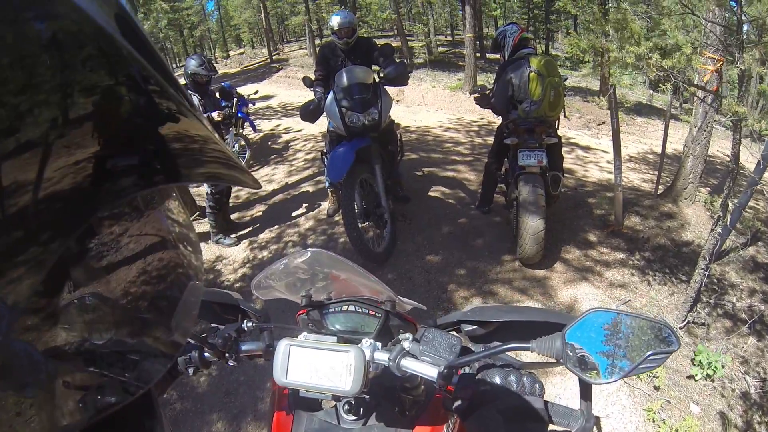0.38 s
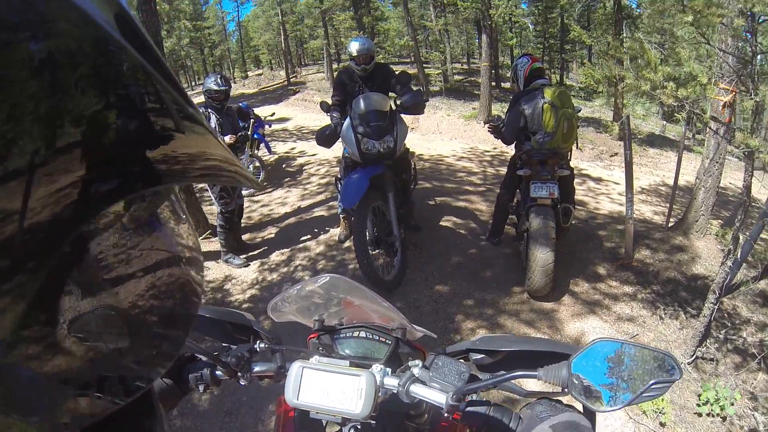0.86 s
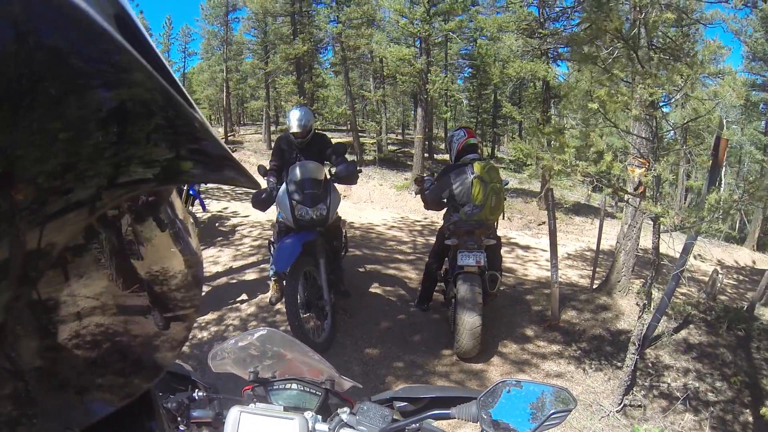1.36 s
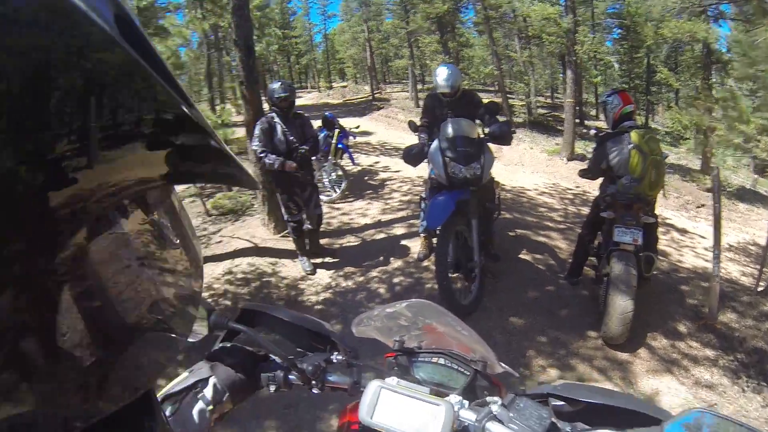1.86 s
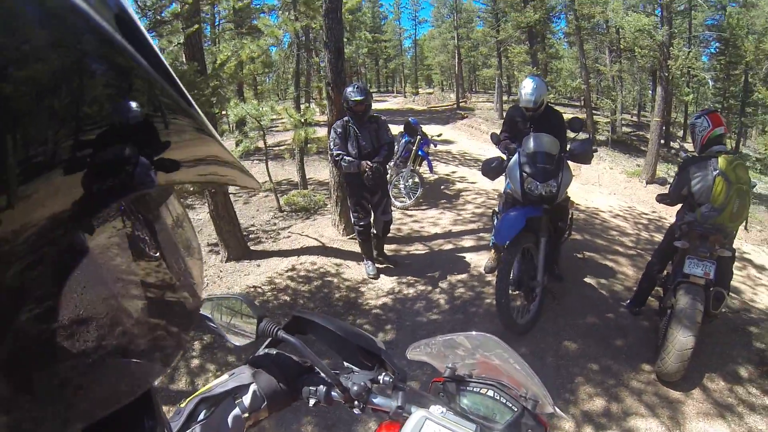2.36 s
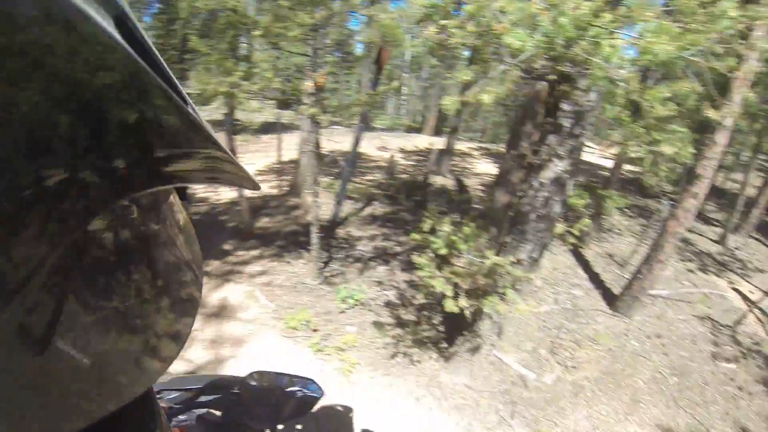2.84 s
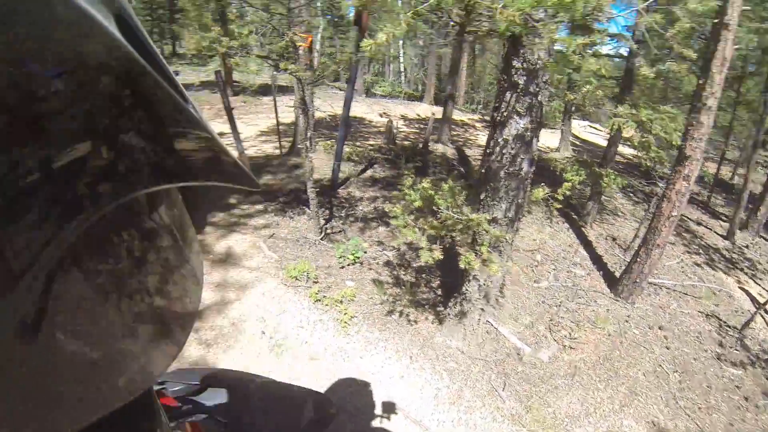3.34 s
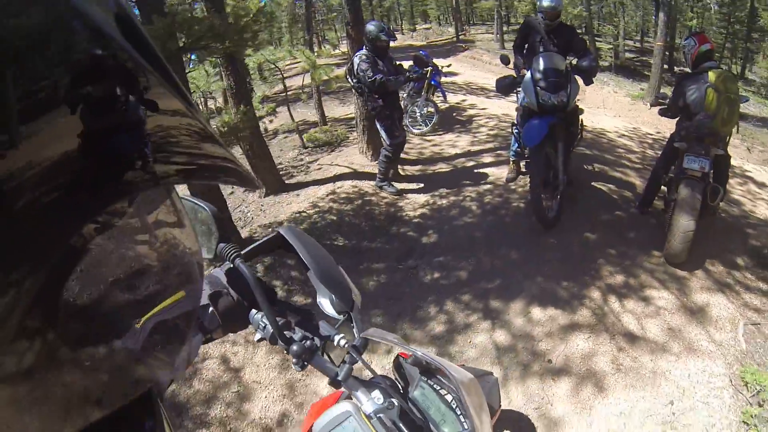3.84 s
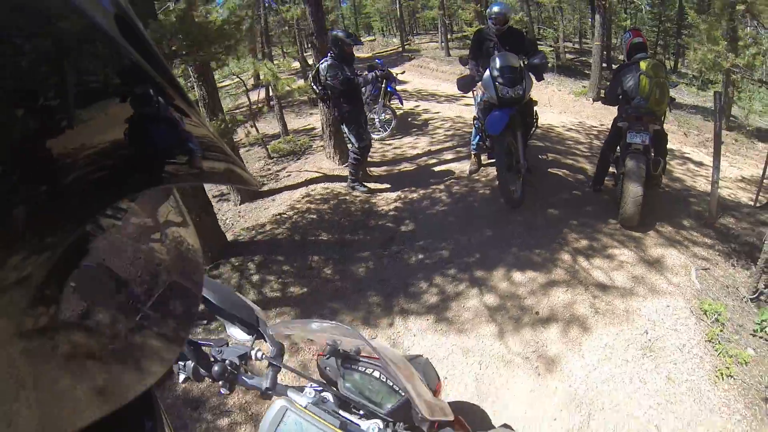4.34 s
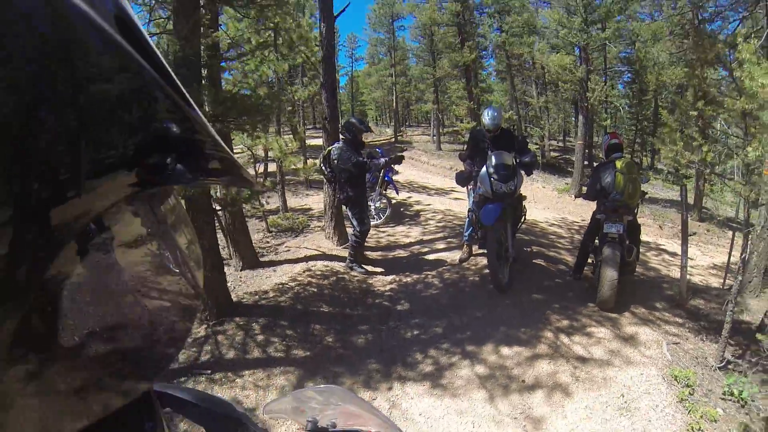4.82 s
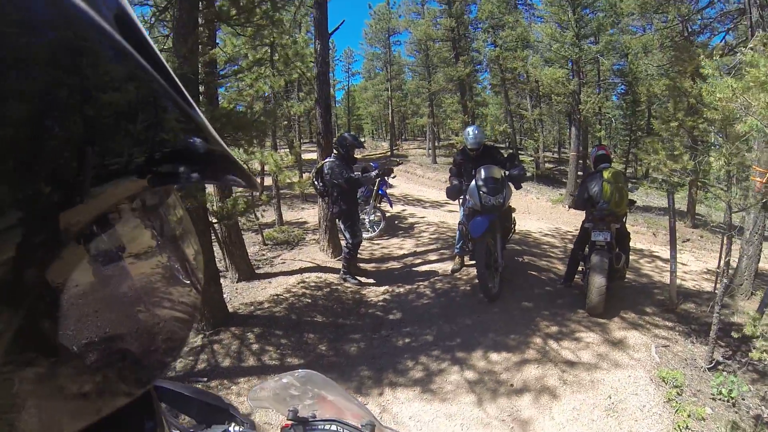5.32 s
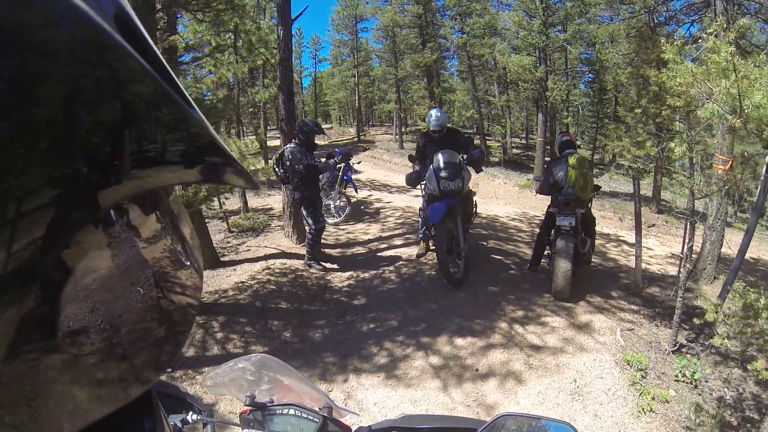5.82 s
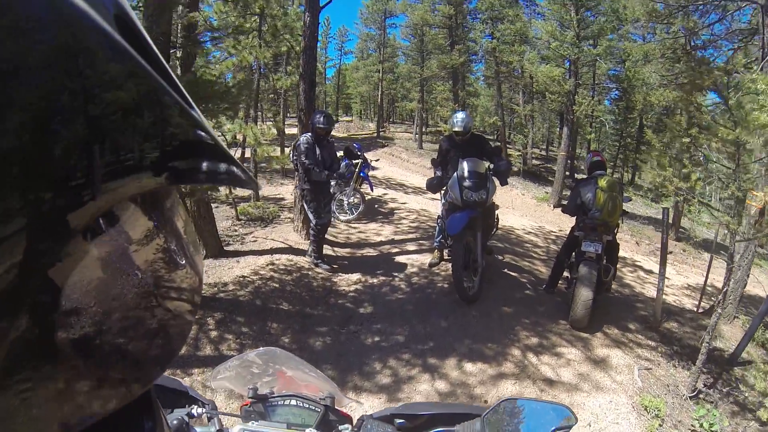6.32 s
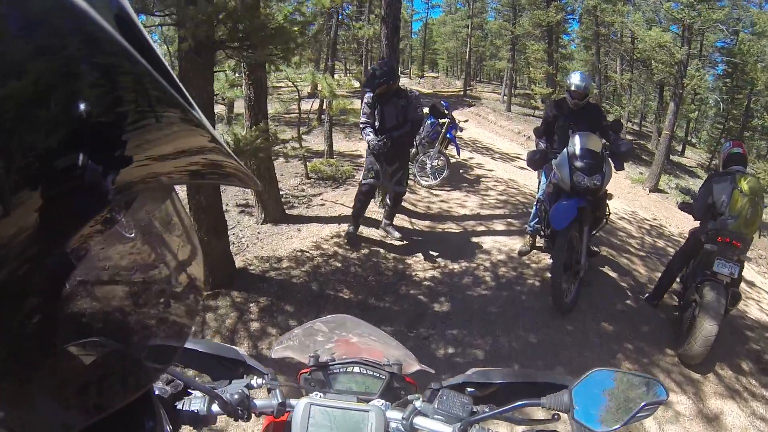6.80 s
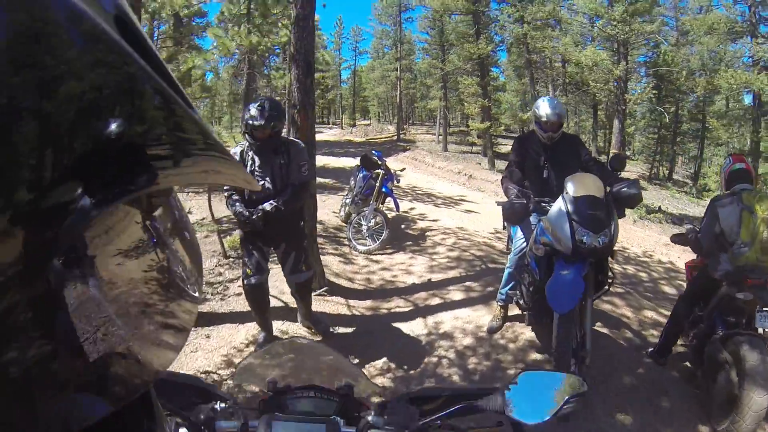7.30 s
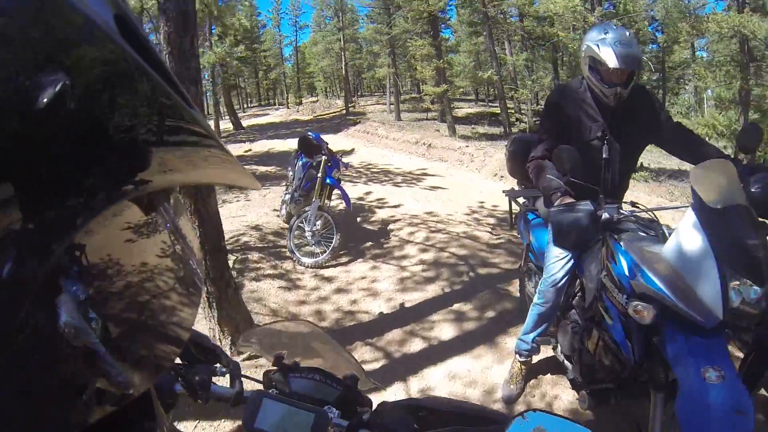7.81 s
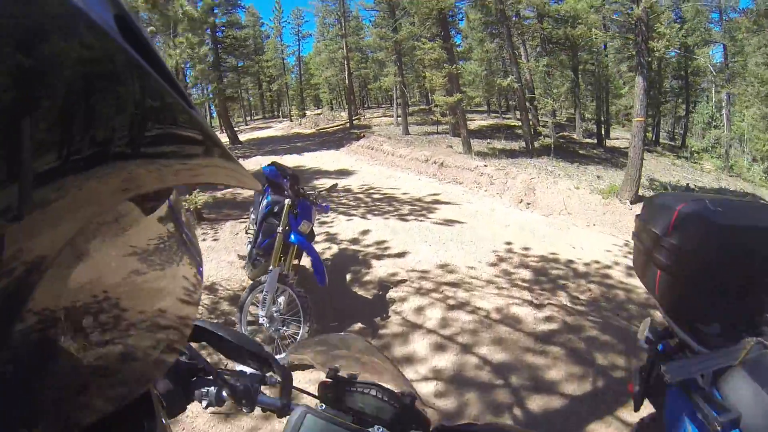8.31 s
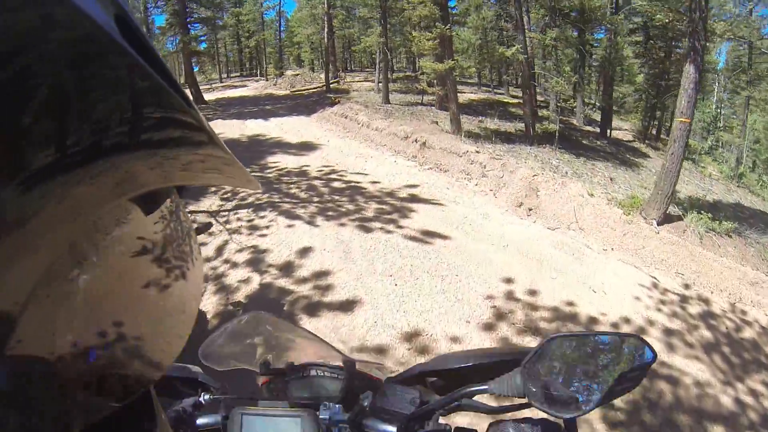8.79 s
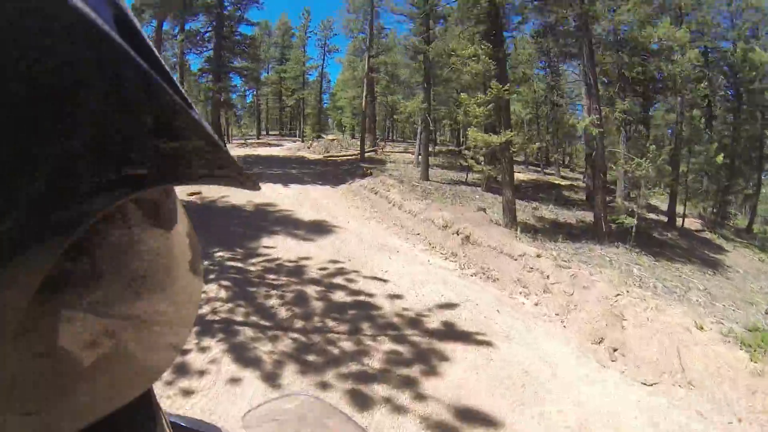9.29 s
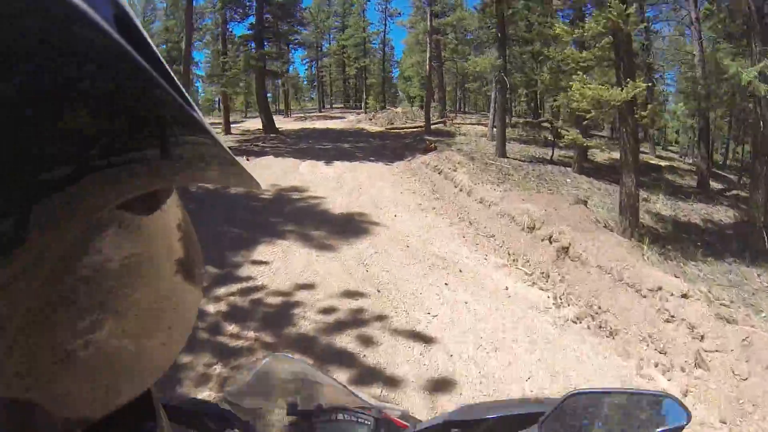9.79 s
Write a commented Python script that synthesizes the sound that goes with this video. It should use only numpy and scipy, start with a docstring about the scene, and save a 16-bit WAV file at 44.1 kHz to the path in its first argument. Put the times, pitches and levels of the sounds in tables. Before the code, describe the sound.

Close, mono, slightly muffled capture of a motorcycle starting on a dirt trail: brief cranking, a rising flare, then uneven idle with dry valve ticking. A cluster of gear knocks lands near three seconds. Soft throttle blips follow, a slow low idle, then the bike moves off and revs harder at the end. Deep mount thuds and shudders accompany it, over thin electronic whine and hiss, with rare high bird chips.

```python
"""A two-cylinder motorcycle is cranked, catches, idles, clunks into gear and revs to pull away on a trail.
Its engine is uneven pairs of pulses ringing pipes and silencer, with bursts of noise as valve clatter.
Decaying modes make the knocks; a wandering low tone and low noise make the shudder of the helmet camera's mount.
Falling sine chips are a few small birds; a thin whine and hiss come from the electronics."""
import sys
import numpy as np
from scipy import signal
from scipy.fft import rfft, irfft, next_fast_len
from scipy.io import wavfile
from scipy.ndimage import uniform_filter1d, minimum_filter1d, map_coordinates

SR = 44100
rng = np.random.default_rng(int(sys.argv[2]) if len(sys.argv) > 2 else 0)


def convert_level_to_amplitude(level_db):
    """Map a level in decibels to its linear amplitude factor."""
    exponent = np.asarray(level_db, float) / 20
    return 10 ** exponent


def file_out(sig):
    """Save sig as 16-bit WAV at sys.argv[1]."""
    # one column per channel
    cols = np.atleast_2d(sig).T
    # limit, then scale
    lim = np.clip(cols, -1, 1)
    pcm = np.round(lim * 32767).astype(np.int16)
    wavfile.write(sys.argv[1], SR, pcm)


N = 437031
T = np.arange(N) / SR

# Bird chips. Each row: start in seconds, start pitch in Hz, end pitch in Hz, length in seconds, level in dB.
BIRD_CHIPS = [(2.32, 10650, 9700, 0.047, -62.5), (5.343, 10930, 9700, 0.035, -59.5),
              (6.301, 8140, 7000, .04, -65.5), (9.12, 10650, 9700, 0.046, -59)]
# Electronic whine. Each row: pitch in Hz, rms level in dB.
WHINE_TONES = [(10643, -73), (10691, -80), (10741, -91), (10837, -93), (13187, -92)]
# Colour of the electronic hiss. Each row: frequency in Hz, relative density in dB per Hz.
HISS_COLOUR = [(2940, -46), (5000, -13), (6800, -22), (10200, -14), (10300, -15), (11000, -14.5),
               (11300, -18), (12600, -25.5), (13200, -18), (13600, -23), (15500, -47), (16500, -120)]

# Shudder of the camera mount. Each row: time in seconds, level in dB, central pitch in Hz.
MOUNT_SHUDDER = [(0.0, -39, 26.9), (0.22, -38, 33.3), (0.52, -21, 31.7), (0.63, -33, 34.2),
                 (0.75, -24, 30.1), (1.07, -32, 30.3), (1.19, -39, 34.2), (1.35, -29, 34.5),
                 (1.63, -36, 31.1), (1.76, -35, 36.9), (1.87, -30, 34.6), (1.99, -24, 28.3),
                 (2.07, -16, 27.6), (2.21, -28, 27.6), (2.45, -20, 27.5), (2.56, -22, 28.8),
                 (2.76, -29, 27.3), (2.87, -16, 27.6), (3.25, -23, 27.7), (3.42, -15, 26.2),
                 (3.5, -23, 26.2), (3.81, -26, 27.7), (4.06, -24, 27.5), (4.11, -14, 26.5),
                 (4.3, -21, 26.2), (4.36, -9, 27.2), (4.47, -28, 28.8), (4.53, -17, 28.9), (5.6, -29, 29.0),
                 (5.71, -29, 30.6), (6.07, -24, 28.5), (6.29, -27, 32.1), (6.65, -16, 30.1),
                 (6.85, -18, 30.4), (6.93, -13, 32.9), (7.06, -13, 33.0), (7.17, -17, 30.3),
                 (7.31, -22, 30.1), (7.48, -23, 31.8), (7.73, -12, 30.0), (7.84, -24, 27.0),
                 (7.92, -11, 26.2), (8.09, -24, 27.6), (8.17, -9, 27.6), (8.28, -16, 27.5),
                 (8.34, -30, 28.4), (8.42, -20, 32.0), (8.58, -14, 28.9), (8.83, -10, 28.9),
                 (8.94, -9, 30.2), (9.05, -27, 30.3), (9.14, -20, 30.2), (9.24, -18, 26.2),
                 (9.36, -26, 27.4), (9.44, -11, 27.6), (9.58, -22, 27.5), (9.69, -10, 27.8),
                 (9.8, -23, 31.9), (9.85, -11, 33.1), (9.91, -16, 32.9)]
# Sudden head movements. Each row: middle in seconds, level in dB, length in seconds.
HEAD_NODS = [(2.632, -18.5, 0.17), (4.102, -19, 0.17), (5.4, -37.5, .2), (8.506, -17, .3), (9.3, -13, .15)]
# Jolts that set the bracket humming. Each row: start in seconds, level in dB, seconds to fade 20 dB.
BRACKET_JOLTS = [(.42, -33, 1), (1.45, -35, 2), (2.9, -33.5, 2.2), (3.421, -21.5, 0.7), (3.6, -48, 0.5),
                 (8.6, -25, 1), (8.78, -22.5, 0.13), (8.901, -23, 0.4)]

# Small parts that ping once. Each row: start in seconds, pitch in Hz, level in dB.
PART_PINGS = [(1.755, 5050, -52), (1.762, 4550, -52), (1.79, 4400, -52), (2.245, 3650, -50),
              (2.25, 4600, -54), (2.35, 5050, -54), (7.85, 3100, -46), (7.88, 3300, -49), (7.93, 3050, -42),
              (8.02, 3150, -46), (8.47, 4000, -46)]
# Gear clunks and case taps. Each row: start in seconds, overall level in dB, then thud, hollow, ping
# and click in dB relative to that level.
KNOCK_EVENTS = [(2.737, -31.5, 8, 1, -25, -10), (2.7445, -31.5, 8, 4, -25, -16),
                (2.7546, -19.5, -8, -27, -30, -37), (2.79, -24, -8, -20, -28, -45),
                (2.818, -21, -8, -20, -26, -40), (2.862, -21, -10, -12, -30, -50),
                (2.8707, -10, -4.5, -9, -32, -55), (2.8764, -5, 16, -8, -34, -42),
                (2.908, -15, 10, -4, -26, -41), (2.921, -24, -8, -6, -22, -42),
                (2.934, -27, -8, -10, -22, -50), (3.8113, -19, -7, -32, -32, -42),
                (6.32, -20, 2, -36.5, -32, -36), (8.8725, -18, -2, -24.5, -9, -26),
                (8.8893, -10, 4, -8.5, -27, -48)]
# Mode groups a knock can ring, from deep to thin. Each row: pitch in Hz, relative level in dB,
# time to fall 60 dB in seconds.
THUD_MODES = [(70, -8, 0.13), (91, -12, 0.27)]
HOLLOW_MODES = [(495, 5, 0.052), (561, 1, 0.038), (655, -6, 0.025)]
SHELL_MODES = [(787, -21.5, 0.079), (1165, -0.5, 0.019), (1510, 4, 0.024), (1714, -3, 0.031)]
PING_MODES = [(3270, 0.5, 0.018), (2400, -5, 0.025)]
TICK_MODES = [(4970, 3, 0.013)]

# Starter strokes before the engine catches. Each row: start in seconds, length in seconds, level in dB.
STARTER_STROKES = [(0.093, 0.059, -38), (0.303, 0.049, -41.5)]
# Starter gear whine. Each row: time in seconds, level in dB.
GEAR_WHIRR = [(0, -64), (.12, -57), (.25, -66), (.46, -55), (.56, -56), (.7, -66)]

# Crankshaft speed. Each row: time in seconds, speed in rpm.
CRANK_RPM = [(0.38, 1001.5), (0.5, 1326.1), (0.72, 1759.9), (1.0, 2031.0), (1.23, 2202.0), (1.38, 2000.3),
             (1.6, 1763.8), (1.8, 1282.8), (2.0, 1175.3), (2.15, 1189.8), (2.25, 1366.4), (2.59, 1309.6),
             (2.93, 1357.5), (3.44, 1241.6), (3.61, 1387.5), (4.3, 1373.0), (4.97, 1360.6), (5.14, 1795.6),
             (5.4, 1586.3), (5.65, 1464.5), (5.82, 1787.9), (5.99, 1479.2), (6.3, 1337.1), (6.67, 1082.6),
             (7.01, 1064.1), (7.35, 1288.1), (7.69, 1279.7), (8.03, 1379.2), (8.37, 1764.7), (8.71, 1554.9),
             (8.95, 1550.9), (9.22, 1622.1), (9.39, 2056.0), (9.56, 1930.9), (9.7, 2162.3), (9.91, 2832.8)]
# Engine levels. Each row: time in seconds, exhaust bark in dB as the throttle opens and shuts, clatter in dB.
ENGINE_LEVELS = [(.38, -51.5, -44.5), (.47, -43, -40), (.75, -37.5, -38.5), (1.0, -33.5, -38),
                 (1.38, -36, -37), (1.46, -47, -42), (2.0, -52.5, -43.5), (2.75, -43, -42),
                 (3.6, -49.5, -43), (4.9, -47, -42.5), (5.09, -38.5, -40.5), (5.25, -36, -40),
                 (5.41, -54, -43.5), (5.73, -36.5, -40), (6.1, -43.5, -42), (6.9, -51, -43.5),
                 (7.35, -44.5, -41), (7.7, -46.5, -40.5), (8.0, -44, -38.5), (8.4, -39.5, -36),
                 (8.6, -49, -37), (9.09, -43, -38.5), (9.41, -33, -35), (9.57, -41.5, -39.5),
                 (9.73, -29, -34), (9.91, -32.5, -33.5)]
# Exhaust balance. Each row: time in seconds, second cylinder's front over the first's in dB, thump level in dB.
BEAT_BALANCE = [(.38, 2, -30), (.8, 7, -26), (1.0, 7, -24), (1.2, 1, -24.5), (1.33, -6, -26), (1.5, 0, -30),
                (1.65, 0, -33), (1.9, -6, -32), (2.3, -2, -29.5), (2.7, -3, -31), (3.2, -6, -32.5),
                (3.7, -4, -30), (4.2, -3, -29.5), (4.6, -6, -29), (4.85, -3, -29), (5.05, 6, -27.5),
                (5.3, 3, -29.5), (5.45, 2, -32), (5.7, 6, -26.5), (5.95, 4, -28), (6.2, 6, -29),
                (6.8, 4, -31), (7.1, 6, -30), (7.4, 3, -28.5), (7.7, 4, -28), (8.2, 5, -25),
                (8.4, 5, -25.5), (8.62, 5, -29), (8.85, 5, -29), (9.1, 4, -30), (9.3, 4, -26.5),
                (9.5, 1, -28), (9.66, 3, -26.5), (9.91, 0, -27)]
# Cylinders. Each row: place in the two-turn cycle from 0 to 1, relative thump in dB, relative bark in dB,
# relative clack in dB, side of the balance.
CYLINDER_PAIR = [(0, -1, -2.5, 0, -.5), (.355, 0, 0, -3.5, .5)]
# Exhaust pipe, one list for each cylinder. Each row: resonance in Hz, width in Hz, relative level in dB.
EXHAUST_PIPES = [
    [(85, 17, 2), (58, 16, -4)],
    [(116, 16, 3), (60, 25, -10), (136, 22, -9)],
]
# Silencer path, one list for each cylinder. Each row: resonance in Hz, width in Hz, relative level in dB.
SILENCER_PATHS = [
    [(241, 20, 9), (170, 50, -6)],
    [(236, 36, 5.5), (185, 55, 0)],
]
# Short, broad tail pipe that shapes the front. Each row: resonance in Hz, width in Hz, relative level in dB.
TAIL_PIPE = [(420, 170, 1.5), (650, 400, -8)]
# Side chamber that swallows one band. Each row: resonance in Hz, width in Hz, dB taken where 0 takes all.
SIDE_CHAMBER = [(297, 60, -3.5)]
# Covers and brackets that ring with the clatter. Each row: resonance in Hz, width in Hz, relative level in dB.
RATTLING_PARTS = [(1150, 45, 3), (1270, 50, 0), (1400, 40, 0), (1475, 30, 3.5), (1790, 40, -9),
                  (1953, 30, -6.5), (2160, 60, -12), (2415, 22, -11), (2570, 22, -14), (2900, 30, -20),
                  (3300, 70, -22), (3625, 32, -17), (3900, 70, -25), (5090, 200, -27)]
# Clatter as heard through the camera case. Each row: frequency in Hz, relative density in dB per Hz.
CASE_COLOUR = [(260, -24), (450, -9), (740, -10.5), (905, -14.5), (1040, -14.5), (1160, 0), (1420, 0),
               (1780, -11), (1950, -12.5), (2120, -22), (3000, -27.5), (3900, -60), (6600, -120)]
# Colour of the mechanical treble. Each row: frequency in Hz, relative density in dB per Hz.
TREBLE_COLOUR = [(1290, -8.5), (2200, 1.5), (2780, -5), (3210, -3), (3750, -7.5), (4710, -11.5),
                 (5150, -13.5), (6730, -19), (9130, -22.5), (10400, -23), (13500, -41), (22000, -120)]


def unit(x):
    """Scale to rms 1."""
    return x / np.sqrt(np.mean(x ** 2) + 1e-20)


def curves(rows):
    """One value per sample for each column after the time."""
    s, *columns = np.transpose(rows)
    return [np.interp(T, s, column) for column in columns]


def wobble(rate):
    """A smooth random curve, rate knots a second."""
    return map_coordinates(rng.standard_normal(int(N * rate / SR) + 4), [T * rate])


def noise():
    """White noise."""
    return rng.standard_normal(N)


def spikes(at, db):
    """One sample of the given size at each time."""
    return np.bincount(np.clip((at * SR).astype(int), 0, N - 1), convert_level_to_amplitude(db), N)


def filtered(x, response):
    """x times a complex response of frequency."""
    m = next_fast_len(N + SR // 2)
    return irfft(rfft(x, m) * response(np.fft.rfftfreq(m, 1 / SR)), m)[:N]


def coloured(x, spectrum):
    """x through (Hz, dB) points, brought to rms 1."""
    hz, db = np.transpose(spectrum)
    return unit(filtered(x, lambda f: convert_level_to_amplitude(np.interp(np.log(f + 1), np.log(hz + 1), db))))


def resonant(x, peaks, turn=-1):
    """x through causal resonances, of alternating sign unless turn is 1."""
    def response(f):
        total = 0
        for k, (hz, width, db) in enumerate(peaks):
            total = total + turn ** k * convert_level_to_amplitude(db) * 1j * f * width / (hz * hz - f * f + 1j * f * width)
        return total
    return filtered(x, response)


def steady(x, span):
    """x with its slow level, averaged over span seconds, divided out."""
    return x / np.sqrt(np.abs(uniform_filter1d(x ** 2, int(span * SR))) + 1e-9)


def electronics():
    """Steady sine whines over a bed of coloured hiss."""
    whine = sum(np.sqrt(2) * convert_level_to_amplitude(db) * np.sin(2 * np.pi * hz * T) for hz, db in WHINE_TONES)
    return whine + convert_level_to_amplitude(-70.0) * coloured(noise(), HISS_COLOUR)


def birds():
    """Short sine chips that fall in pitch and swell and fade as half a sine."""
    out = np.zeros(N)
    for s, start_hz, end_hz, length, db in BIRD_CHIPS:
        u = np.clip((T - s) / length, 0, 1)
        turns = length * (start_hz * u + (end_hz - start_hz) * u ** 2 / 2)
        out += convert_level_to_amplitude(db) * np.sin(np.pi * u) * np.sin(2 * np.pi * turns)
    return out


def mount():
    """The camera shudders on its arm, the head sways, and a bracket hums on after each jolt."""
    shudder_db, hz = curves(MOUNT_SHUDDER)
    swing = np.sqrt(2) * np.sin(2 * np.pi * np.cumsum(hz + 2.0 * wobble(12)) / SR)
    shake = coloured(noise(), [(12, -30), (20, 0), (30, 6.5), (42, 7), (55, -15), (90, -80), (300, -150)])
    shudder = unit(convert_level_to_amplitude(1.7 * wobble(9)) * swing + 0.45 * shake)

    sway_colour = [(2, -48.0), (6, 5.0), (15, 13.5), (22, -8.0), (40, -69.0), (120, -150)]
    sway = steady(coloured(noise(), sway_colour), span=0.16)
    nods = sum(convert_level_to_amplitude(db) * np.exp(-(2 * (T - s) / length) ** 2) for s, db, length in HEAD_NODS)
    sway_level = convert_level_to_amplitude(shudder_db - 13.5 + 4.7 * wobble(9.9)) + nods

    bracket = [(66.0, 42, 0)]
    hum = steady(resonant(resonant(noise(), bracket), bracket), span=0.18)
    hum_level = convert_level_to_amplitude(-45)
    for s, db, fade in BRACKET_JOLTS:
        onset = np.clip((T - s) / 0.011, 0, 1)
        hum_level = hum_level + convert_level_to_amplitude(db - 20 * np.clip(T - s, 0, 9) / fade) * onset
    return convert_level_to_amplitude(shudder_db + 0.2) * shudder + sway_level * sway + hum_level * hum


def pings():
    """Each small part rings briefly on one note, falling 60 dB in 0.05 s."""
    out, t = np.zeros(N + SR), T[:SR // 5]
    for s, hz, db in PART_PINGS:
        onset = 1 - np.exp(-t / .001)
        out[round(s * SR):][:len(t)] += convert_level_to_amplitude(db - 60 * t / .05) * np.sin(2 * np.pi * hz * t) * onset
    return out[:N]


def knocks():
    """Gear clunks and taps on the case: groups of modes with a soft onset, a crack and a thin click."""
    out, t = np.zeros(N + SR), T[:SR // 3]

    def ring(modes):
        return sum(convert_level_to_amplitude(db - 60 * t / t60) * np.sin(2 * np.pi * hz * t) for hz, db, t60 in modes)

    soft_onset = (1 - np.exp(-t / 0.0012)) ** 2
    for s, db, thud_db, hollow_db, ping_db, click_db in KNOCK_EVENTS:
        grit = rng.standard_normal(len(t) + 1)
        crack = uniform_filter1d(grit[1:], size=14) * convert_level_to_amplitude(-13.5 - 60 * t / 0.018)
        click = np.diff(grit) * convert_level_to_amplitude(click_db + 13.5 - 60 * t / 0.011)  # differencing thins the noise
        click = click + convert_level_to_amplitude(click_db - 4) * ring(TICK_MODES)
        blow = convert_level_to_amplitude(thud_db - 5) * ring(THUD_MODES) + convert_level_to_amplitude(hollow_db - 6.5) * ring(HOLLOW_MODES)
        blow = blow + convert_level_to_amplitude(-5.5) * ring(SHELL_MODES) + convert_level_to_amplitude(ping_db) * ring(PING_MODES) + crack
        out[round(s * SR):][:len(t)] += convert_level_to_amplitude(db) * (blow * soft_onset + click)
    return filtered(out[:N], lambda f: 1 / (1 + (f / 8000) ** 4))


def starter():
    """The motor rasps over each compression; its gear whines unevenly until it lets go."""
    strokes = 0
    for s, length, db in STARTER_STROKES:
        onset = np.clip((T - s) / 0.0025, 0, 1)
        sag = convert_level_to_amplitude(-60 * np.clip(T - s, 0, 1))
        release = np.clip((s + length - T) / 0.024 + 1, 0, 1)
        strokes = strokes + convert_level_to_amplitude(db) * onset * sag * release
    rasp = coloured(convert_level_to_amplitude(1.5 * wobble(90)) * noise(), CASE_COLOUR)
    rasp = rasp + convert_level_to_amplitude(-12) * coloured(noise(), TREBLE_COLOUR)

    gear_tone = [(3270, 60, 0)]
    gear = unit(resonant(resonant(noise(), gear_tone), gear_tone))
    whirr_db, = curves(GEAR_WHIRR)
    let_go = np.clip((.75 - T) / .1, 0, 1)
    return (strokes + convert_level_to_amplitude(-52)) * rasp * (T < .385) + convert_level_to_amplitude(whirr_db) * gear * let_go


def heated(x, peaks):
    """x through exhaust resonances that climb as the revs rise and the gas gets hotter."""
    cool_rpm, hot_rpm, rise = 1650, 2150, 1.13
    hot = np.clip((curves(CRANK_RPM)[0] - cool_rpm) / (hot_rpm - cool_rpm), 0, 1)
    raised = [(hz * rise, width * rise, db) for hz, width, db in peaks]
    return resonant(x * (1 - hot), peaks, turn=1) + resonant(x * hot, raised, turn=1)


def firings():
    """Each cylinder fires once in two turns: a suck of gas rings its own pipe, its steep front barks, valves clack."""
    rpm, = curves(CRANK_RPM)
    lead_db = curves(BEAT_BALANCE)[0]
    cycles = np.cumsum(rpm * (T >= CRANK_RPM[0][0])) / (120 * SR)  # two turns each
    thump, barks, fronts, clacks = 0, 0, 0, 0

    def puff(f):
        return 1 / (1 + 1j * f / 150) ** 2  # the gas leaves over a few ms

    for order, (place, thump_db, bark_db, clack_db, side) in enumerate(CYLINDER_PAIR):
        at = np.interp(np.arange(int(cycles[-1] - place) + 1) + place, cycles, T)
        luck = rng.standard_normal((len(at), 5))  # no two beats alike
        at = at - .002 + .00012 * luck[:, 3]
        lean_db = side * np.interp(at, T, lead_db)
        suck = spikes(at - .0053, thump_db + .9 * luck[:, 0])
        thump = thump - resonant(filtered(suck, puff), EXHAUST_PIPES[order], turn=1)
        bark = spikes(at - .0041, bark_db + .8 * lean_db + .8 * luck[:, 1])
        barks = barks - heated(bark, SILENCER_PATHS[order])
        fronts = fronts + spikes(at - .0041, lean_db + .8 * luck[:, 1] + .9 * luck[:, 4])
        clacks = clacks + spikes(at + .0006, clack_db + .4 * lean_db + 1.9 * luck[:, 2])
    return thump, barks, fronts, clacks


def exhaust(thump, barks, fronts):
    """Beats ring the pipes and silencer, the tail pipe shapes their fronts, a side chamber takes out a band."""
    bark_db, _ = curves(ENGINE_LEVELS)
    thump_db = curves(BEAT_BALANCE)[1]
    front_db = -52.5 + 0.95 * (bark_db + 46)  # the front swings a little less than the bark

    def soft(f):
        return 1 / (1 + 1j * f / 1200) ** 2  # the silencer rounds the front

    breath = resonant(.004 * noise(), SILENCER_PATHS[0], turn=1)
    bark = steady(filtered(barks, soft) + breath, span=.3)
    front = steady(resonant(filtered(fronts, soft), TAIL_PIPE), span=.3)
    low = convert_level_to_amplitude(thump_db) * steady(thump, span=.3) + convert_level_to_amplitude(bark_db + 1.5) * bark + convert_level_to_amplitude(front_db) * front
    return low - heated(low, SIDE_CHAMBER)


def valve_clatter(clacks):
    """Each beat sets off a burst of valve and intake noise and strikes covers and brackets that ring."""
    bark_db, clatter_db = curves(ENGINE_LEVELS)
    rpm, = curves(CRANK_RPM)
    treble_db = -54.3 + 0.91 * (clatter_db + 42) + .7 * np.log2(rpm / 1400)  # treble also grows with revs
    load = convert_level_to_amplitude(.4 * (bark_db + 43))  # an open throttle sharpens the bursts
    decay = signal.lfilter([1], [1, -np.exp(-1 / (0.0061 * SR))], clacks * load)
    gate = (.75 + 1.7 * decay) * convert_level_to_amplitude(1.5 * wobble(60))  # loose parts rattle between the beats

    struck = 26 * clacks * load  # each beat also strikes the covers directly
    shaken = struck + (decay + 1.3) * noise()
    ringing = 0
    for k, part in enumerate(RATTLING_PARTS):
        come_and_go = convert_level_to_amplitude(2.5 * wobble(3) + 3 * wobble(17))
        ringing = ringing + (-1) ** k * come_and_go * resonant(shaken, [part])

    clatter = steady(coloured(gate * noise(), CASE_COLOUR) + 0.85 * unit(ringing), span=0.31)
    sizzle_bursts = (0.96 + 1.02 * decay) * convert_level_to_amplitude(1.4 * wobble(90)) * noise()
    sizzle = steady(coloured(sizzle_bursts, TREBLE_COLOUR), span=0.33)
    return convert_level_to_amplitude(clatter_db) * clatter + convert_level_to_amplitude(treble_db) * sizzle


def engine():
    """The uneven firing pulses drive exhaust and clatter together from the moment the engine catches."""
    thump, barks, fronts, clacks = firings()
    running = np.clip((T - .372) / 0.0056, 0, 1)
    return running * (exhaust(thump, barks, fronts) + valve_clatter(clacks))


def scene():
    """All the sources in front of the camera, and its mount, as one channel."""
    return (birds() + mount() + pings() + knocks() + starter() + engine())[None]


def gain_control(x):
    """Peaks above -2.5 dB pull the gain down; it is held for 0.2 s and moves with an 80 ms lag."""
    over_db = np.clip(20 * np.log10(np.abs(x) + 1e-9) + 2.5, 0, 2.4)
    held_db = -minimum_filter1d(-over_db, int(.2 * SR), origin=int(.1 * SR) - 2)  # looks back only
    duck_db = signal.lfilter([1 / (.08 * SR)], [1, 1 / (.08 * SR) - 1], held_db)
    return x * convert_level_to_amplitude(-2.2 * duck_db)


def band_limit(x):
    """A steep low-pass at the top of the band."""
    return signal.sosfilt(signal.butter(12, 15690, fs=SR, output="sos"), x)


def record(dry):
    """Electronics add hiss and whine; gain control ducks after the highest peaks; what is left over clips."""
    mix = gain_control(dry[0] + electronics())
    return band_limit(np.clip(mix, -1, 1)[None])


dry = scene()
out = record(dry)
file_out(out)
```